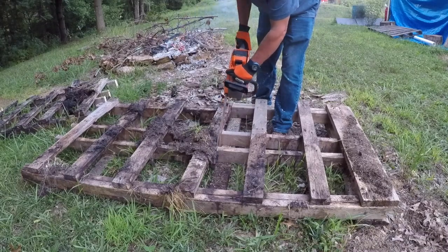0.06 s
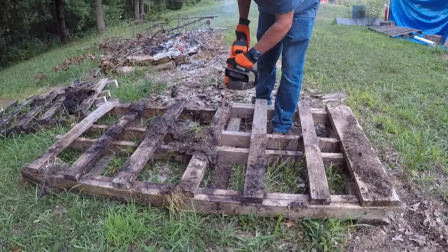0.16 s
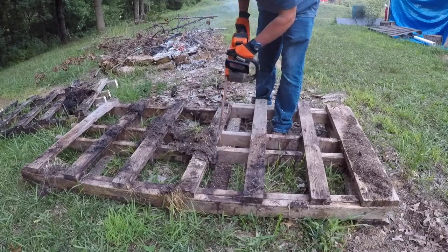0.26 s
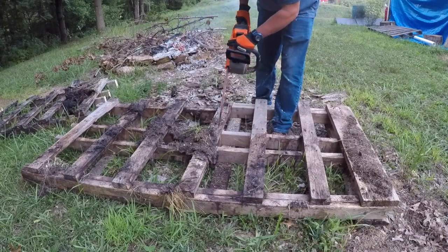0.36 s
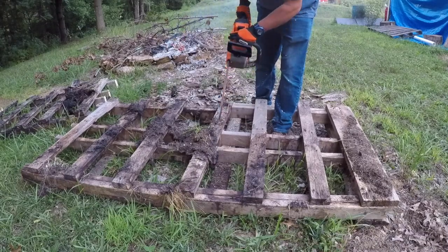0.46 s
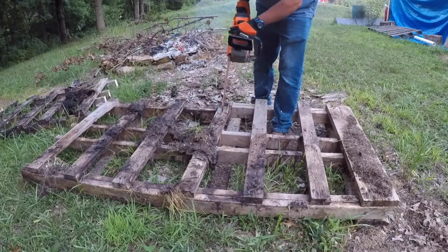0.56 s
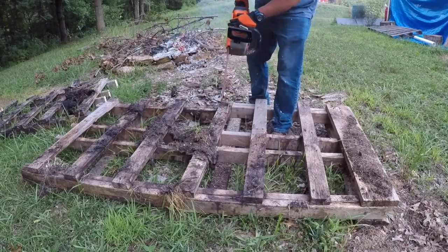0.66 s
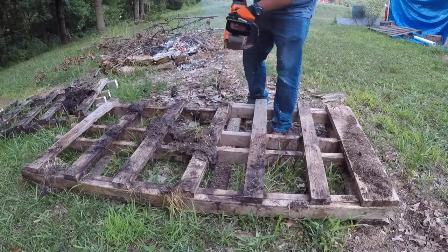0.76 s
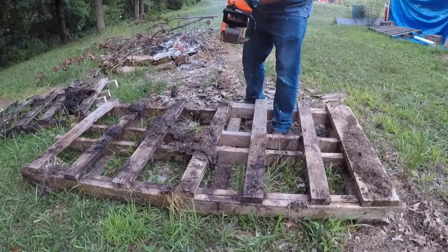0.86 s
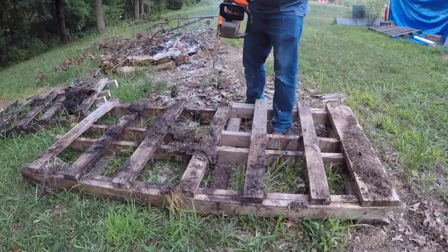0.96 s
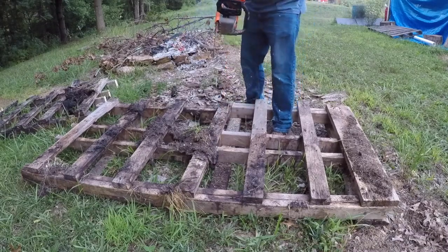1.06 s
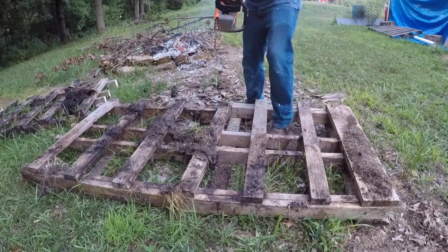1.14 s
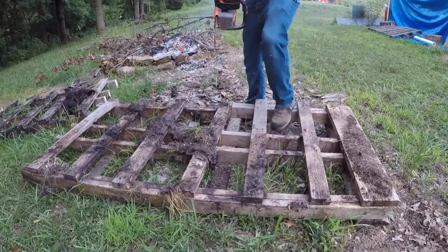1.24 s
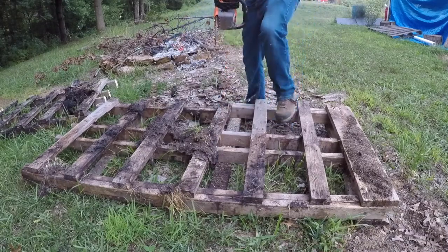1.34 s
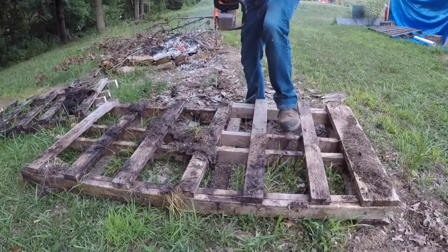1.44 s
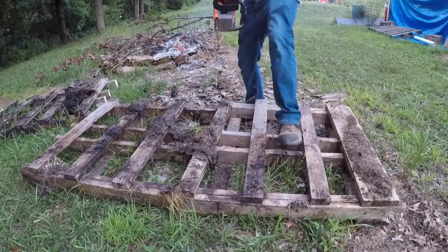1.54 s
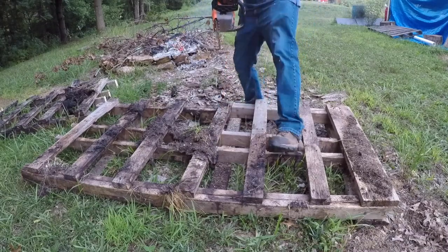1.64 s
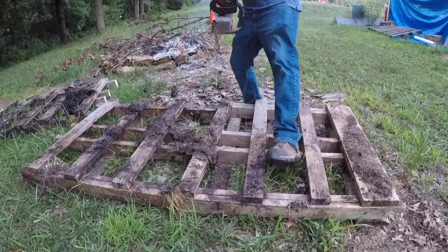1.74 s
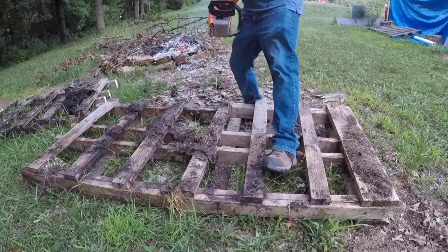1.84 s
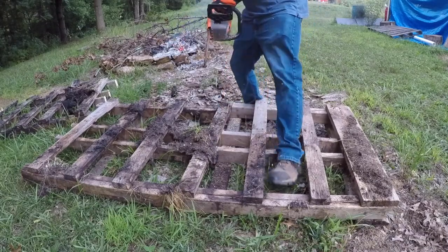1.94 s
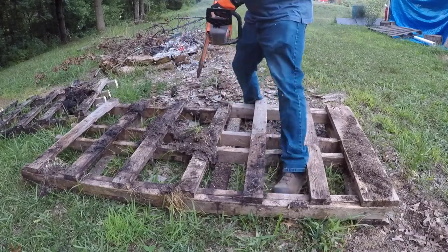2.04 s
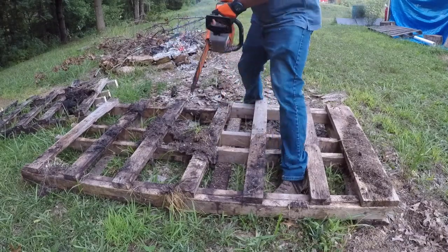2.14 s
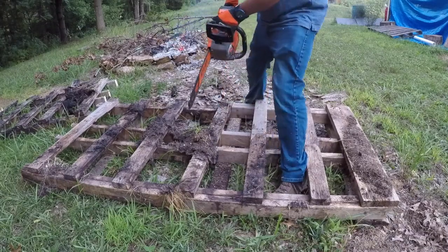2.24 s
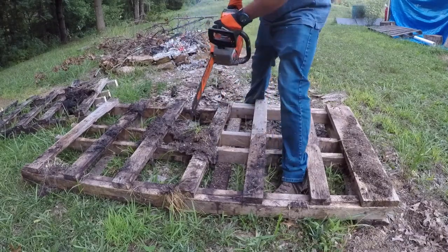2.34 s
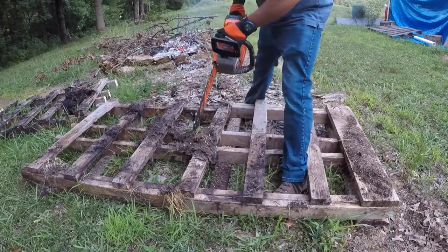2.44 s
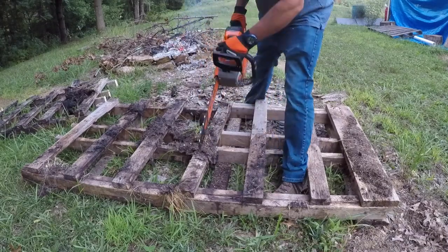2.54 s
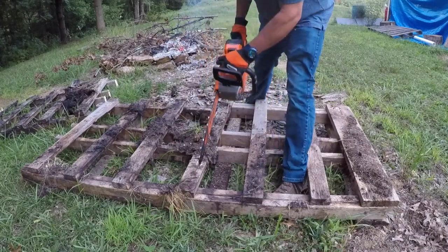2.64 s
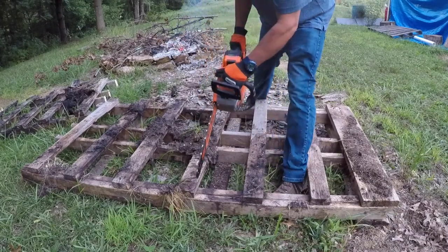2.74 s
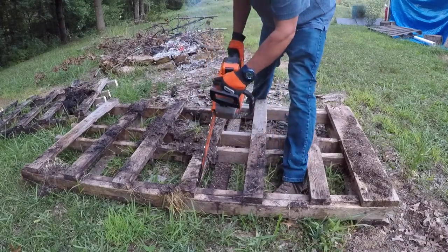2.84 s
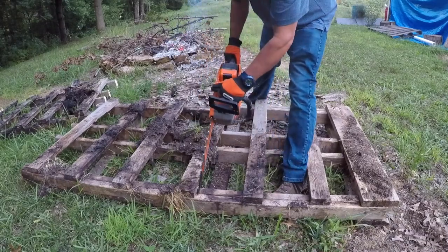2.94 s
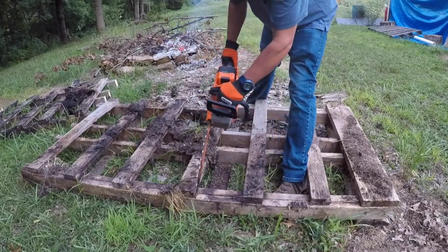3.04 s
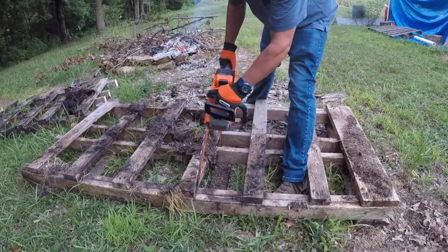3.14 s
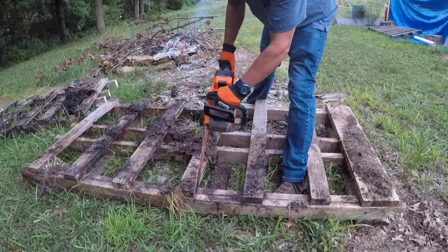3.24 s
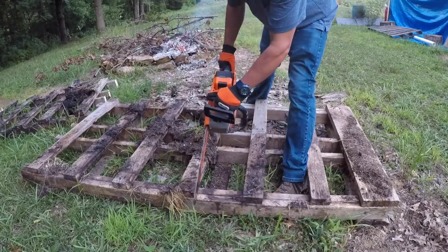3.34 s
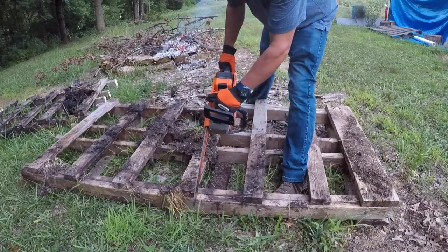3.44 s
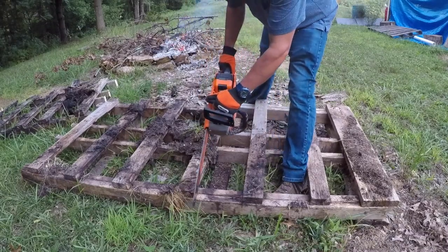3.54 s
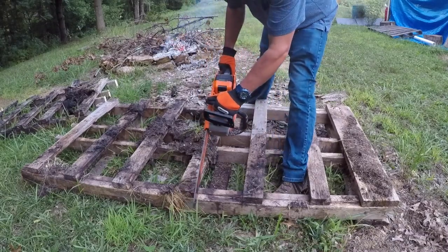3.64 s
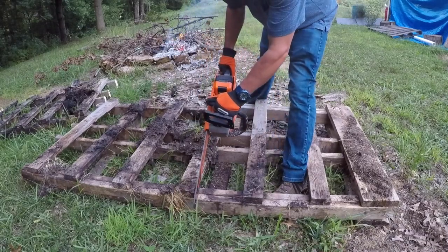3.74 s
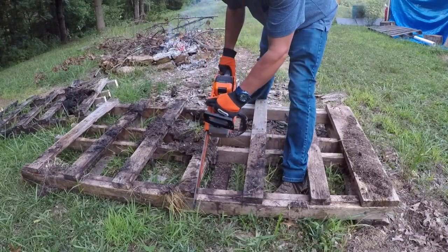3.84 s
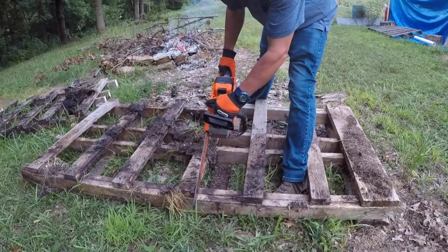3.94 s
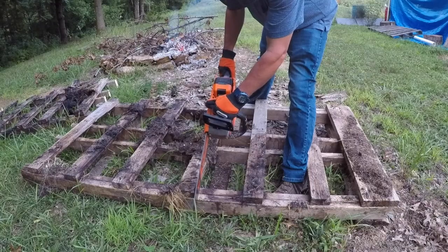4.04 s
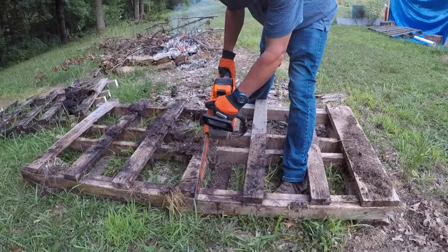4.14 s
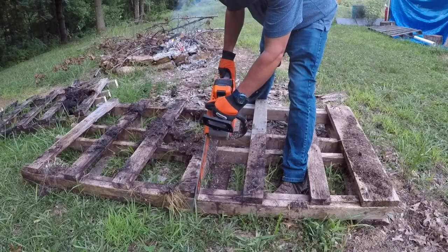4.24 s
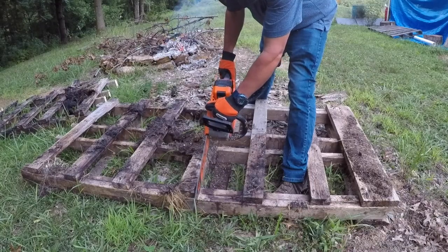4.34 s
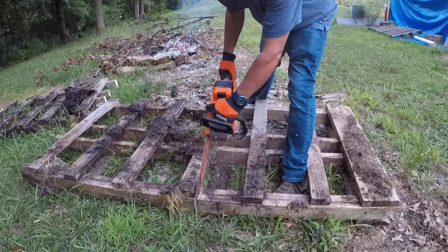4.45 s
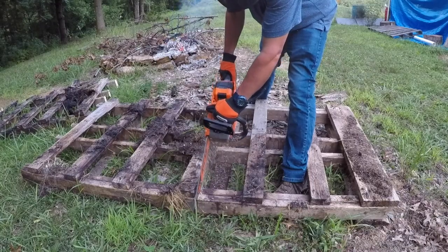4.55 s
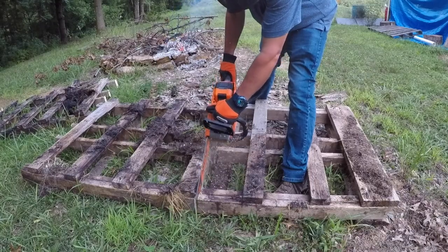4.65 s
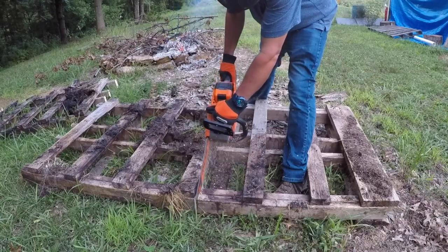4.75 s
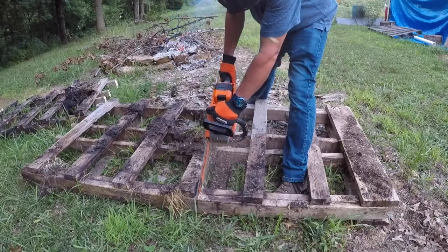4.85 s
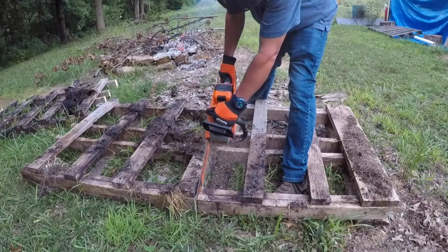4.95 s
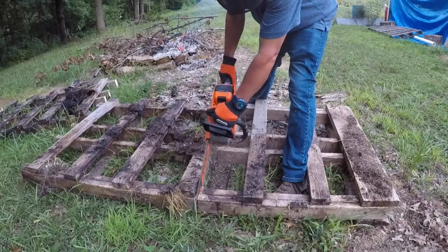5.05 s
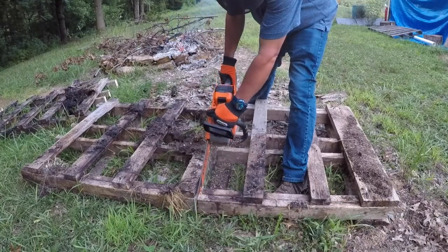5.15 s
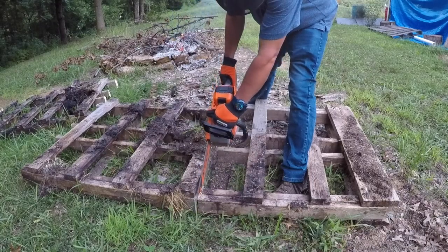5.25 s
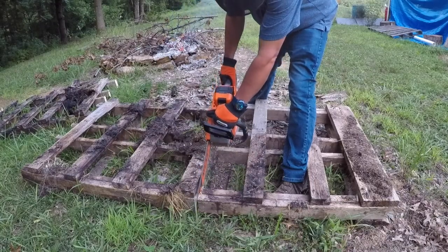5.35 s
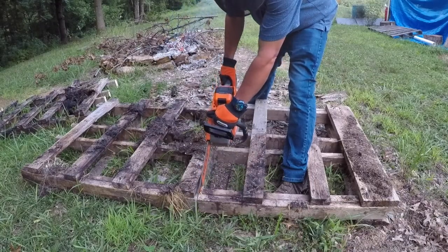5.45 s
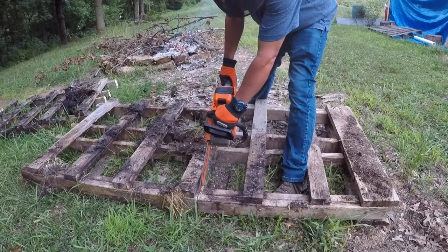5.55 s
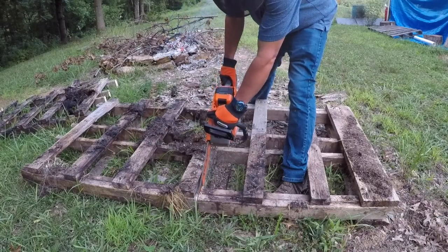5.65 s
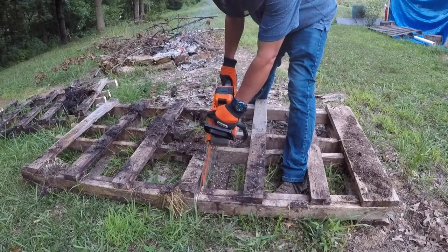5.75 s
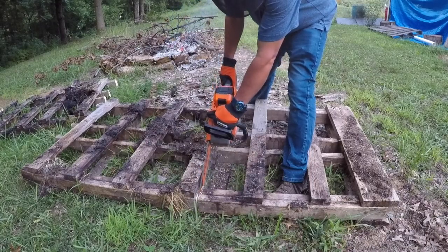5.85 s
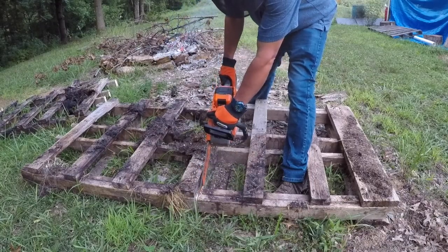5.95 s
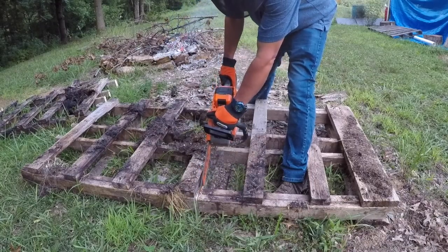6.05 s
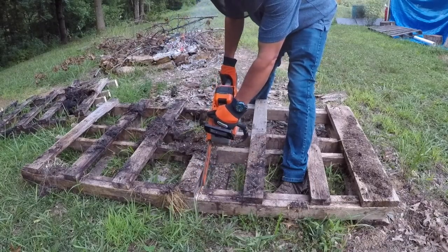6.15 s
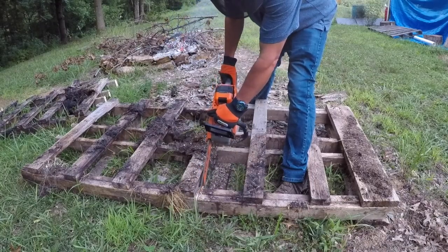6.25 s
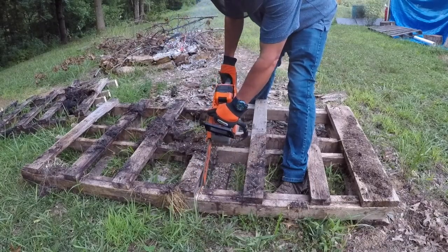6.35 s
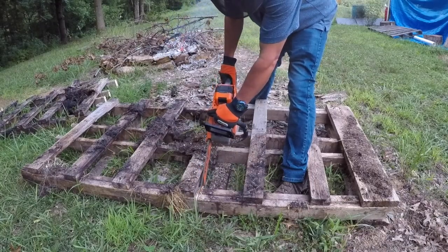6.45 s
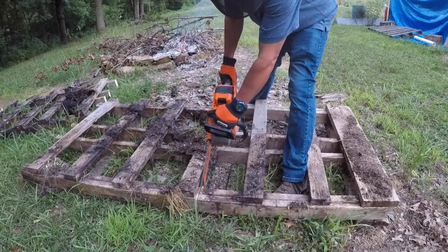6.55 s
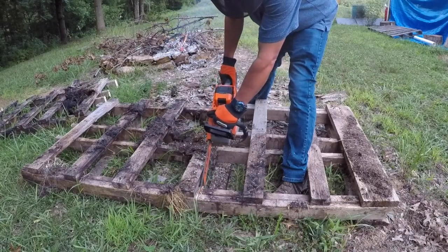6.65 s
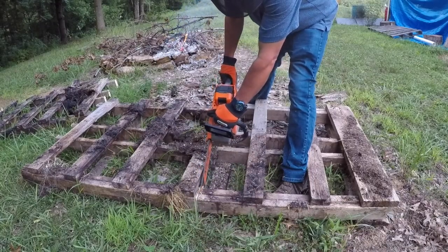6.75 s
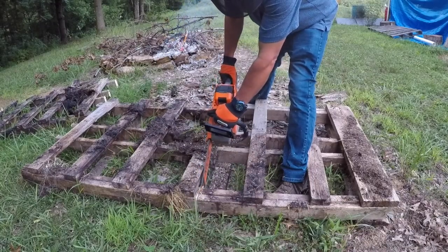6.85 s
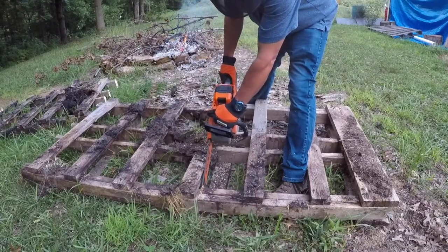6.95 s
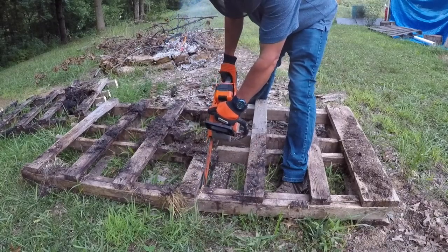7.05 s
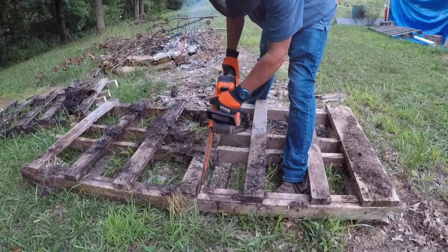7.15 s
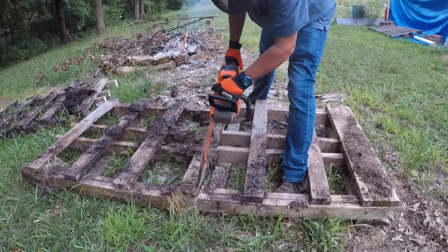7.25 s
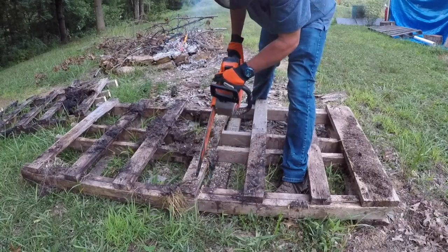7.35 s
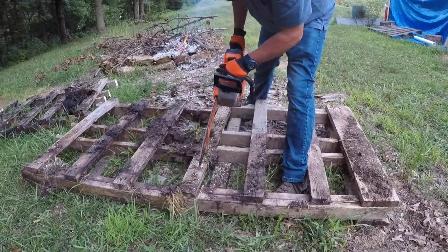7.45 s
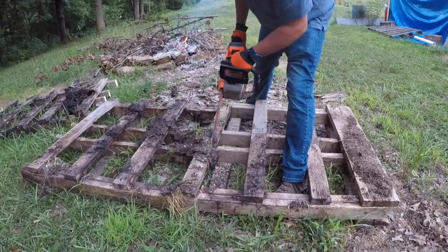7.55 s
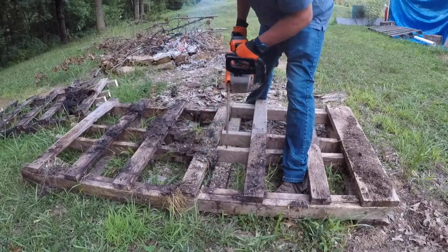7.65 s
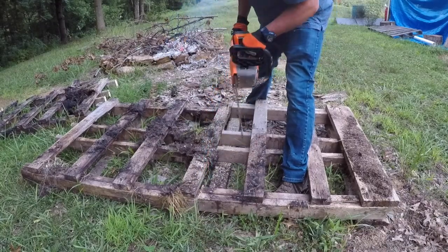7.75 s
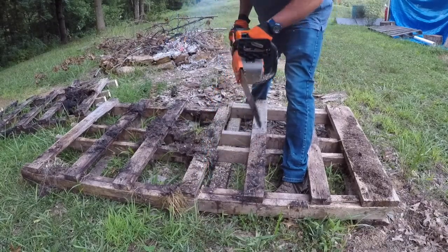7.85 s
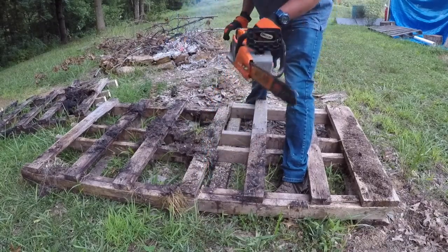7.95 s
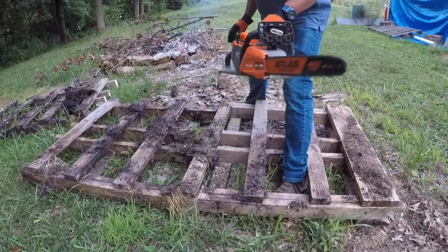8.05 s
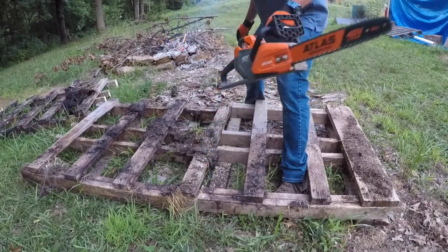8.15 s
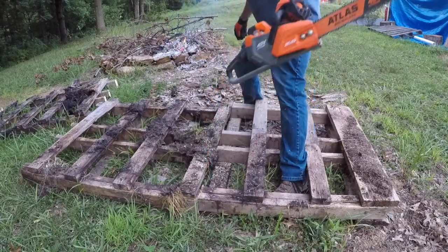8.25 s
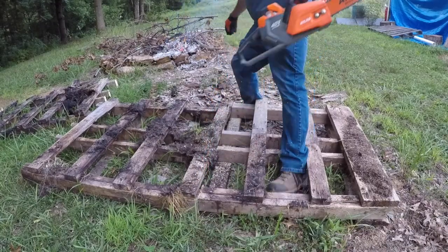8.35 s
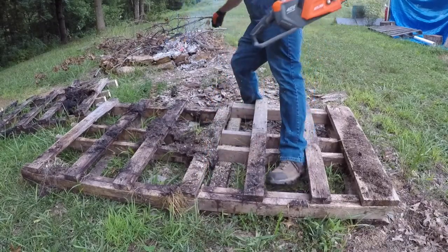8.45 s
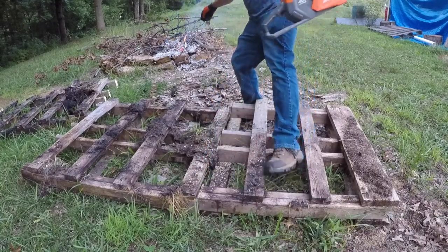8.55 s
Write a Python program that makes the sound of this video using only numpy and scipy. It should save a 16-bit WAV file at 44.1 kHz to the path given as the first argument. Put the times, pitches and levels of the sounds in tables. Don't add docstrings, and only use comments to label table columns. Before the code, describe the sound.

A cordless chainsaw coasts down and stops dead, boots shift on an old pallet, then it spins up, cuts a board and brakes.

```python
import sys
import numpy as np
from scipy import signal
from scipy.fft import rfft, irfft
from scipy.io import wavfile
from scipy.ndimage import uniform_filter1d, map_coordinates

SR = 44100
rng = np.random.default_rng(int(sys.argv[2]) if len(sys.argv) > 2 else 0)


def undo_db(level):
    steps = np.asarray(level, float) / 20
    return 10 ** steps


def transcribe(u):
    v = np.clip(np.atleast_2d(u).T, -1, 1)
    q = np.round(v * 32767).astype(np.int16)
    wavfile.write(sys.argv[1], SR, q)


N = 379260
TEETH = 6


def unit(x):
    return x / np.sqrt(np.mean(x ** 2) + 1e-20)


def noise():
    return rng.standard_normal(N)


def curves(*tables, off=None):
    t = np.arange(N) / SR
    s, *cols = np.transpose([row for table in tables for row in table])
    if off is None:
        return [np.interp(t, s, c) for c in cols]
    inside = sum((t >= table[0][0]) & (t <= table[-1][0]) for table in tables)
    return [np.where(inside, np.interp(t, s, c), off) for c in cols]


def held(rows, rise_db, fall_db):
    t = np.arange(N) / SR
    gain = 0
    for start, end, db in rows:
        before, after = np.clip(start - t, 0, None), np.clip(t - end, 0, None)
        gain = gain + undo_db(db - rise_db * before - fall_db * after)
    return gain


def wobble(rate):
    coarse = np.arange(0, N + 32, 32)
    knots = rng.standard_normal(int(N * rate / SR) + 4)
    return np.interp(np.arange(N), coarse, map_coordinates(knots, [coarse * rate / SR]))


def colour(x, points):
    f, db = np.transpose(points)
    hz = np.fft.rfftfreq(8192, 1 / SR)
    gain_db = np.interp(np.log(hz + 1), np.log(f + 1), db)
    cepstrum = irfft(np.log(undo_db(gain_db) + 1e-5))
    cepstrum[1:4096] *= 2
    cepstrum[4097:] = 0
    return unit(signal.oaconvolve(x, irfft(np.exp(rfft(cepstrum))))[:N])


def blows(turns, scatter_db, jitter):
    at = np.flatnonzero(np.diff(np.floor(turns)) > 0)
    draw = rng.standard_normal((N // 8, 3))[:len(at)]
    at = np.clip(at + jitter * SR * draw[:, 0], 0, N - 1).astype(int)
    size = undo_db(scatter_db * np.clip(draw[:, 2], -3, 1.8))
    return np.bincount(at, np.sign(draw[:, 1]) * size, N)


def flow(x, span):
    return x / np.sqrt(np.abs(uniform_filter1d(x ** 2, int(span * SR))) + 1e-6)


def near(hz, centre, width):
    return 1 / (1 + ((hz - centre) / width) ** 4)


# (time [s], wind level [dB], grass level [dB])
STIR = [(.97, -63.5, -60.5), (1.24, -63, -70), (1.512, -64, -70.5), (1.628, -59, -71), (1.95, -49, -60),
        (2.084, -44.5, -57.5), (2.194, -58, -59.5), (2.3, -53.5, -66.5), (2.45, -56, -67.5),
        (2.576, -65.5, -66.5), (2.704, -58, -73), (2.96, -63, -62), (8.14, -67.5, -58.5), (8.21, -57, -63),
        (8.266, -60, -62.5), (8.376, -61, -59.5), (8.51, -51.5, -54), (8.6, -64, -64)]
# (frequency [Hz], level [dB/Hz])
GUST = [(12, -31), (20, 0.5), (38, 5.5), (97, 6), (198, -2.5), (376, -7), (400, -22), (520, -47.5),
        (880, -120)]
# (frequency [Hz], level [dB/Hz])
GRASS = [(120, -39), (200, -23), (377, -6.5), (493, -6), (542, -4.5), (2170, -18), (5000, -23.5),
         (6500, -48), (11000, -120)]
# (frequency [Hz], level [dB/Hz])
HISS = [(1180, -26.5), (2000, -3), (4010, -5), (7470, -1), (8970, -7.5), (13100, -8.5), (14500, -9)]


def lawn():
    buffet_db, rustle_db = curves(STIR)
    hiss_db = -76 + 0.6 * (rustle_db + 70.5)
    buffet = undo_db(buffet_db - 3 + 2.8 * wobble(22)) * colour(noise(), GUST)
    blades = unit(blows(np.arange(N) * 400 / SR, 7, .002))
    rubbing = colour(noise() + 0.64 * blades, GRASS)
    rustle = undo_db(rustle_db - 1.5 + 1.4 * wobble(76) + 2.0 * wobble(15)) * rubbing
    hiss = undo_db(hiss_db + 1.1 * wobble(30)) * colour(noise(), HISS)
    note = colour(noise(), [(7500, -58.0), (7700, 6.5), (7790, -0.5), (8000, -52.0)])
    return buffet + rustle + hiss + undo_db(-85 + 2.5 * wobble(8)) * note


# (time [s], peak level [dB])
THUMPS = [(1.654, -44), (1.794, -56), (1.826, -41), (1.885, -40), (1.928, -32), (1.982, -39), (2.029, -38),
          (2.049, -40), (2.077, -44), (2.111, -43), (2.279, -42), (2.328, -48), (2.699, -49), (8.234, -48),
          (8.278, -45.5), (8.325, -51), (8.511, -52)]


def thumps():
    out, u = np.zeros(N + SR), np.arange(SR // 10) / SR / 0.0033
    for s, db in THUMPS:
        push = u * (2 - u) * np.exp(-u)
        out[round(s * SR):][:len(u)] += undo_db(db + 5) * rng.choice([-1, 1]) * push
    return out[:N]


# (time [s], peak level [dB], knock level [dB], snap level [dB], knock frequency [Hz])
TICKS = [(1.0323, -42.5, -14, -10, 1260), (1.2441, -54, -17.5, -20, 600), (1.3124, -63, -2, -4, 400),
         (1.353, -66, 2, 2, 300), (1.391, -67.5, 2, 8, 300), (1.434, -65.5, 5, 8, 685),
         (1.5885, -58, -0.5, 1, 1340), (1.6564, -57, 8, 0, 240), (1.668, -53, -9, 3, 300),
         (1.689, -62, -9, 8, 300), (1.7308, -50.5, 8, 5, 476), (1.737, -64, 17, 2, 560),
         (1.7434, -44.5, 5.5, -16, 570), (1.814, -60, 7, 7, 625), (1.879, -72, 4, 7, 1000),
         (1.898, -62, -11, 0, 900), (1.9117, -43, 3, 1, 670), (1.9217, -55, 11, 7, 312),
         (1.988, -60, 6, 8, 350), (2.0317, -53, -4, 3, 400), (2.062, -42.5, -8, -10, 450),
         (2.0774, -47, -9, -13, 500), (2.099, -58, 19.5, 11, 397), (2.113, -65, 17, 6, 480),
         (2.127, -60, 16, -3, 420), (2.139, -52, -9, -2, 400), (2.215, -66, 4, 9, 620),
         (2.2648, -55, 1, -10, 597), (2.33, -69, 8, 4, 1850), (2.464, -65, 2, 5, 302),
         (2.5062, -45, -14, -2, 597), (2.621, -63, 4, 3, 340), (2.6684, -63, 7, 13, 796),
         (2.6923, -60, 2, 16, 800), (2.728, -67, -2, 5, 300), (2.778, -69, 7, 14, 900),
         (2.929, -54, -23, -20, 900), (8.283, -50, -5, 0, 250), (8.4632, -57, -2, 2, 554),
         (8.5294, -44, -16, 0, 560), (8.5494, -51, -14, 4, 560)]


def boots():
    out, t = np.zeros(N + SR), np.arange(SR // 8) / SR
    snappy = signal.butter(2, [550, 2300], "band", fs=SR)
    crisp = signal.butter(1, [2500, 9000], "band", fs=SR)
    for s, db, knock_db, snap_db, knock_hz in TICKS:
        tick_env = (undo_db(2.5 - 60 * t / 0.0081) + undo_db(-9.5 - 60 * t / 0.062)) * (1 - np.exp(-t / 0.00055))
        tick = signal.lfilter(*crisp, rng.standard_normal(len(t)) * tick_env)
        knock = np.sin(2 * np.pi * knock_hz * t) * undo_db(knock_db + 1.5 - 60 * t / 0.04)
        snap_env = undo_db(snap_db - 6.0 - 60 * t / 0.014) + undo_db(snap_db - 0.5 - 60 * t / 0.058)
        snap = signal.lfilter(*snappy, rng.standard_normal(len(t)) * snap_env)
        out[round(s * SR):][:len(t)] += undo_db(db) * (tick + knock + undo_db(2.0) * snap)
    return out[:N]


# (frequency [Hz], level [dB], decay by 60 dB [s])
RELAY = [(844, -2.5, 0.075), (1170, 1.5, 0.042), (3250, -2.5, 0.14), (4370, -7, .025), (6700, -7, .02),
         (8400, -4, 0.024)]
# (time [s], sideband offset [Hz], level [dB])
WHISTLE = [(2.95, 30, -54), (3.05, 100, -53), (3.09, 210, -51), (3.128, 250, -46), (3.138, 263, -90)]
# (frequency [Hz], level [dB/Hz])
SIZZLE = [(2800, -38), (3600, -1), (4600, -3), (5400, -12), (7000, -40)]


def trigger():
    out, t, time = np.zeros(N), np.arange(SR // 2) / SR, np.arange(N) / SR
    ring = sum(undo_db(db - 60 * t / t60) * np.sin(2 * np.pi * hz * t) for hz, db, t60 in RELAY)
    click = signal.lfilter(*signal.butter(2, 8500, fs=SR), rng.standard_normal(len(t)))
    out[round(2.9455 * SR):][:len(t)] = undo_db(-40.0) * ring + undo_db(-45 - 60 * t / 0.011) * click
    hum = undo_db(2.5 * wobble(70)) * np.sin(2 * np.pi * 3255 * time + 1.0 * wobble(90))
    hum_gain = held([(2.96, 3.14, -55.5)], rise_db=3000, fall_db=900)
    out += hum_gain * (hum + undo_db(-8) * colour(noise(), SIZZLE))
    side_hz, db = curves(WHISTLE, off=-120)
    carrier = 2 * np.pi * 7830 * time
    swing = 2 * np.pi * np.cumsum(side_hz * (db > -100)) / SR
    whistle = 0
    for k, side_db in [(-1, -4.5), (1.3, -0.5), (0.33, -11.5)]:  # (multiple, dB)
        whistle += undo_db(side_db + 2.5 * wobble(40)) * np.sin(carrier + k * swing + .7 * wobble(200))
    return out + undo_db(db) * whistle


# (time [s], peak level [dB])
RATTLES = [(3.005, -44), (3.017, -40), (3.052, -38), (3.063, -36), (3.091, -28), (3.117, -21), (3.143, -28),
           (3.175, -23), (3.213, -24), (3.229, -23), (3.249, -26), (3.262, -21), (3.277, -23), (3.3, -27),
           (3.318, -20), (3.364, -12)]
# (frequency [Hz], level [dB/Hz])
HOUSING_FREE = [(120, -42.5), (200, -31.5), (285, -22.5), (371, -4), (584, -5), (689, -15.5), (878, -11),
                (981, -15), (1200, 0), (1370, -10), (1670, -11.5), (2030, -12.5), (2800, -13),
                (3640, -58.5), (6160, -120)]
# (frequency [Hz], level [dB/Hz])
COVER_FREE = [(1000, -31.5), (1700, 1.5), (1880, -6), (2090, -0.5), (2650, -3.5), (3000, -6.5),
              (3930, -7.5), (4770, -13), (7000, -22), (7500, -12), (9750, -35.5), (16500, -120)]


def rattles():
    t, hits = np.arange(SR // 20) / SR, np.zeros(N + SR)
    for s, db in RATTLES:
        hits[round(s * SR):][:len(t)] += undo_db(db - 60 * t / 0.031) * rng.standard_normal(len(t))
    hits = hits[:N]
    ring = colour(hits, HOUSING_FREE) + undo_db(-12) * colour(hits, COVER_FREE)
    return undo_db(-13) * ring * np.sqrt(np.mean(hits ** 2))


# (time [s], peak level [dB])
PINGS = [(3.3497, -30), (3.3951, -29), (3.4071, -26), (3.4285, -25), (3.4704, -27), (3.4879, -23),
         (3.5278, -23), (3.653, -25), (3.7897, -14), (3.8356, -22), (3.8561, -22), (3.876, -21),
         (3.9284, -21), (4.2631, -32)]
# (time [s], peak level [dB])
FIRST_BITE = [
    (3.7897, -14),
    (3.8015, -16.5),
    (3.8047, -22),
]


def pings():
    out, t = np.zeros(N + SR), np.arange(SR // 50) / SR
    for s, db in PINGS:
        tone = np.sin(2 * np.pi * rng.normal(12200, 350) * t) * (1 - np.exp(-t / .0003))
        out[round(s * SR):][:len(t)] += undo_db(db + 2.0 - 60 * t / .012) * tone
    high = signal.butter(2, 3800, "high", fs=SR)
    for s, db in FIRST_BITE:
        crack = undo_db(db - 60 * t / .009) * rng.standard_normal(len(t))
        out[round(s * SR):][:len(t)] += signal.lfilter(*high, crack)
    return out[:N]


# (time [s], length [s], frequency [Hz], width [Hz], level [dB])
SQUEAKS = [
    (7.075, 0.023, 6870, 1502, -25),
]


def squeaks():
    out, t = np.zeros(N), np.arange(N) / SR
    for s, length, hz, width_hz, db in SQUEAKS:
        band = colour(noise(), [(hz - 2 * width_hz, -50), (hz, 0), (hz + 2 * width_hz, -50)])
        window = np.exp(-((t - s - length / 2) / (length / 2)) ** 4)
        out += undo_db(db + 3.5 * wobble(240)) * band * window
    return out


# (trigger pulled [s], brake closed [s])
RUNS = [
    (-1, .938),
    (2.95, 8.088),
]
# (frequency [Hz], level [dB/Hz])
AFTER_RING = [(300, -22), (520, 3), (800, -16), (1150, 0), (1700, -40), (3000, -60)]


def brake():
    gain = held([(b - .01, b + 0.022, -38) for a, b in RUNS], rise_db=600, fall_db=1500)
    return gain * colour(noise(), AFTER_RING)


def brake_gate():
    fall = 900
    moving = held([(a, b, 0) for a, b in RUNS], rise_db=9000, fall_db=fall)
    grab = held([(b - 0.005, b, -10) for a, b in RUNS], rise_db=400, fall_db=fall)
    return moving + grab


# (time [s], ground delay [ms], echo share [1], bar facing level [dB], motor facing level [dB])
POSE = [(0, 0.47, .13, 1.5, -9.5), (.3, .36, 0.15, 2, 3.5), (.7, 0.33, 0.19, 3.5, 1),
        (.95, .27, 0.23, 0.5, -17), (2.9, 0.5, 0.05, 0.5, 6), (3.45, 0.48, 0.033, -0.5, -4),
        (3.8, 0.46, 0.031, 0.5, 2.5), (4.25, 0.37, 0.12, 0, 0), (4.75, 0.405, .2, -1.5, 10.5),
        (5.5, 0.399, 0.19, -0.5, -7), (6.05, 0.411, 0.2, -1.5, 7), (6.4, .45, 0.18, -1.5, 1.5),
        (7.1, 0.39, 0.073, 0.5, 0.5), (7.45, 0.37, 0.21, 4, 2), (7.6, 0.41, 0.31, 5, -6.5),
        (7.74, .3, 0.1, 5.5, -0.5), (7.82, .3, 0.15, 3, -5.5), (8.1, 0.26, 0.12, -2.5, -6.5)]


def ground(x):
    delay_ms, share = curves(POSE)[:2]
    at = np.clip(np.arange(N) - delay_ms * SR / 1000, 0, N - 1)
    return (x + share * map_coordinates(x, [at])) / np.sqrt(1 + share ** 2)


def patchy(x, patchy_db):
    z = signal.stft(x, nperseg=256)[2]
    field = uniform_filter1d(rng.standard_normal(z.shape), size=7, axis=0)
    field = uniform_filter1d(field, size=70, axis=1)
    return signal.istft(z * undo_db(patchy_db * unit(field)), nperseg=256)[1][:N]


# (time [s], low frequency [Hz], low level [dB], high frequency [Hz], high level [dB])
BEAM = [(0, 9700, 0.5, 12600, 0), (.12, 9700, -1, 13000, 2), (.4, 9250, 0.5, 12800, 8),
        (.5, 9050, 2.5, 12800, -2), (.7, 9200, 4, 12700, -7), (.8, 9520, -2.5, 12760, -6),
        (3.1, 9800, 5, 12350, -4), (3.4, 10100, 2.5, 12200, 5), (3.7, 9800, 2, 12000, 6.5),
        (4, 9800, 0.5, 12300, 3), (4.25, 9800, 1.5, 11900, -3), (4.6, 9700, 4.5, 12000, 3),
        (6.1, 9450, 0, 12000, -2), (7.05, 9600, -5.5, 11900, 0.5), (7.2, 9600, 8, 11800, 3),
        (7.45, 8750, -2, 11000, 2), (7.7, 9500, -11, 12300, 0), (7.9, 9500, 3, 12900, -5)]


def beamed(x):
    hz, t, z = signal.stft(x, SR, nperseg=256)
    s, *cols = np.transpose(BEAM)
    low_hz, low_db, high_hz, high_db = (np.interp(t, s, c) for c in cols)

    def lobe(centre):
        return np.exp(-((hz[:, None] - centre) / 650) ** 2)

    gain_db = low_db * lobe(low_hz) + high_db * lobe(high_hz)
    return signal.istft(z * undo_db(gain_db), nperseg=256)[1][:N]


# (time [s], tooth rate [Hz])
SPEED = [
    [(0, 800), (.09, 753), (.2, 728), (.3, 648), (.4, 559), (.5, 481.7), (.7, 351.3), (.8, 293.2),
     (.945, 206)],
    [(2.95, 12), (3.12, 80), (3.43, 434), (3.51, 490), (3.59, 535), (3.8, 592), (4.31, 603), (4.53, 852),
     (5.55, 834), (6.05, 848), (6.3, 915), (6.85, 895), (7.07, 908), (7.165, 836), (7.285, 806),
     (7.466, 618), (7.614, 487), (7.83, 338), (8.095, 176)],
]


def chain_speed():
    tooth_hz = uniform_filter1d(curves(*SPEED)[0], SR // 26, mode="nearest")
    slowing = np.gradient(tooth_hz) * SR < -610
    coasting = uniform_filter1d(1. * slowing, SR // 10)
    moving = 1. * (curves(*SPEED, off=0)[0] > 0)
    return tooth_hz, coasting, uniform_filter1d(moving, SR // 50, mode="nearest")


# (time [s], bite share [1], feed level [dB])
CUT = [(0, 0.9, 4), (.09, 0.8, 2), (.12, 0.7, -2.5), (.3, 0.6, -3), (.95, .3, -2), (3.2, 0.5, -0.5),
       (3.75, 0.9, -1), (4.05, 0.8, 1.5), (4.3, .9, 4.5), (4.42, 1, 3.5), (5.3, 1, 4), (5.8, 1, 4.5),
       (6.05, 1, 4), (6.3, 0.97, 0), (6.76, 0.99, 2.5), (7.1, 0.92, 0), (7.4, 0.61, -3.5), (8, 0.5, -1.5)]
# level at 600 teeth a second [dB],
# rise per octave [dB], shares of feed, bar facing and soft start [1]
ROAR = (-25.5, 4, 1., -0.06, 1.6)
RASPING = (-32.5, 9, 0.61, 0.32, 0.6)
CLATTER = (-33.5, 8, 0.58, 1.5, 0.8)


def drive_levels(on):
    tooth_hz, = curves(*SPEED)
    feed_db, facing_db = curves(CUT)[1], curves(POSE)[2]
    octaves = np.log2((tooth_hz + 40) / 600)
    since = np.arange(N) / SR - 2.95
    lag = -3 * (since > 0) * np.exp(-np.abs(since) / 0.07)
    on_db = 20 * np.log10(on + 1e-6)
    return [on_db + db + rise * (octaves + soft * lag) + fed * feed_db + faced * facing_db
            for db, rise, fed, faced, soft in (ROAR, RASPING, CLATTER)]


# (frequency [Hz], level [dB])
MESH = [(80, -69), (200, -54), (290, -44), (380, -27.5), (460, -28), (570, -21), (690, -29.5), (850, -37),
        (920, -37.5)]
# (frequency [Hz], driven level [dB], coasting level [dB])
OCTAVE = [(160, -70, -68), (420, -50, -40), (575, -36, -27.5), (740, -38, -41), (900, -35.5, -42.5),
          (1205, -23, -35), (1270, -35, -34), (1375, -32.5, -29.5), (1690, -33.5, -33), (1800, -33.5, -31)]


def mesh_tones(tooth_hz, coasting, turn):
    motor_db = curves(POSE)[3]

    def through(hz, points, column):
        points = np.transpose(points)
        return np.interp(np.log(hz), np.log(points[0]), points[column])

    mesh_db = through(tooth_hz, MESH, 1) + motor_db
    driven_db, coast_db = (through(2 * tooth_hz, OCTAVE, column) for column in (1, 2))
    octave_db = (1 - coasting) * driven_db + coasting * coast_db + wobble(3.2) + .4 * coasting * motor_db
    mesh_gain = undo_db(mesh_db + 1.5 * wobble(30) + 0.71 * wobble(7.5))
    mesh = mesh_gain * np.sin(TEETH * turn + 0.09 * wobble(40))
    octave = undo_db(octave_db + 1.7 * wobble(30)) * np.sin(2 * TEETH * turn + 0.42 * wobble(40))
    return mesh + octave


SHAFT = [1, 2, 3, 4, 5, 7, 8, 9, 10]
# (driven level [dB], coasting level [dB])
SHAFT_DB = [(4.5, 8), (3, 1), (-14, -9), (-9, -7.5), (-11, -7), (-8, -14.5), (-8, -14), (-12.5, -16),
            (-13.5, -18.5)]
# (multiple [1], frequency [Hz], width [Hz], level re roar [dB])
CROSSINGS = [(13, 1290, 130, -13), (13, 1900, 50, -21), (14, 1410, 110, -17), (14, 1965, 70, -21),
             (15, 1500, 110, -20), (17, 2570, 90, -17), (18, 1600, 200, -19), (24, 2150, 300, -18.5),
             (30, 4400, 260, -21)]
# (multiple [1], level re roar [dB])
SLACK = [(8, -11), (10, -10), (11, -9), (13, -10), (14, -11), (15, -11), (16, -12), (18, -16), (19, -14),
         (20, -14), (21, -12), (22, -14), (24, -16), (26, -14), (30, -14)]
# (multiple [1], frequency [Hz], width [Hz], level re roar [dB])
OVERTONES = [(3, 1320, 190, -9), (3, 2300, 200, -18), (4, 3200, 280, -11), (5, 2650, 200, -21),
             (8, 3050, 220, -24)]


def shaft_orders(tooth_hz, coasting, turn, bite, feed_db, roar_db):
    turn_hz = tooth_hz / TEETH

    def radiate(hz):
        lift = undo_db(0.88 * np.interp(hz, *np.transpose(HOUSING_FREE[1:-2])))
        small_source = 1 / (1 + (235 / hz) ** 4)
        rocking = 0.15 / (1 + ((hz - 110) / 27) ** 2)
        return lift * (small_source + rocking)

    out = np.zeros(N)
    for k, (driven, free) in zip(SHAFT, SHAFT_DB):
        db = driven + (free - driven) * coasting + 2.5 - 4.5 * bite * (1 - coasting)
        tone = np.sin(k * turn + (.12 + 0.35 * bite) * wobble(30))
        out += undo_db(roar_db + db + 2.6 * wobble(14)) * radiate(k * turn_hz) * tone
    for k, hz, width, db in CROSSINGS:
        gain = undo_db(roar_db + db - 8 * coasting + 3 * wobble(12)) * near(k * turn_hz, hz, width)
        out += gain * np.sin(k * turn + .4 * wobble(25))
    for k, db in SLACK:
        gain = undo_db(roar_db + db + 3 * wobble(14)) * (1 - bite ** 5) * radiate(k * turn_hz)
        out += gain * np.sin(k * turn + .3 * wobble(25))
    wood_db = -12 * bite ** 4 * (1 - coasting) - 2.2 * np.clip(feed_db, 0, 9)
    for k, hz, width, db in OVERTONES:
        gain = undo_db(roar_db + db + wood_db + 2 * wobble(20)) * near(k * tooth_hz, hz, width)
        out += gain * np.sin(k * TEETH * turn + .7 * wobble(40))
    return out


# (start [s], end [s], level [dB])
SHUDDERS = [
    (1, 0.054, -44),
    (4, 5.9, -43),
    (6.5, 6.64, -53),
]
# (frequency [Hz], level [dB/Hz])
BOARD = [(12, -59.5), (20, -27), (54, -35), (88, -9.5), (118, -4), (141, -17), (178, -19), (280, 1),
         (360, -30), (620, -120)]
# (start [s], end [s], level [dB])
DRUMS = [
    (-1, 0.075, -26),
    (4, 4.33, -31),
]
# (frequency [Hz], level [dB/Hz])
SLAT = [(120, -48), (195, -3), (280, -34), (390, 8.5), (480, -23), (588, 3), (680, -24.5), (785, 0),
        (900, -35.5)]
# (frequency [Hz], level [dB/Hz])
BAR = [(1030, -29.5), (1074, 10), (1120, -29.5), (1930, -45.5), (1985, -6.5), (2040, -37.5)]


def board_and_bar(knocks, chips, on, bite, roar_db):
    shake = held(SHUDDERS, rise_db=63, fall_db=58.5) * on + undo_db(roar_db - 41.0 + 2.3 * wobble(12))
    shudder = shake * undo_db(1.2 * wobble(17)) * colour(noise(), BOARD)
    drum = held(DRUMS, rise_db=72, fall_db=250.0) * colour(knocks, SLAT)
    return shudder + drum + undo_db(roar_db - 12.5) * bite * colour(chips, BAR)


# (frequency [Hz], level [dB/Hz])
HOUSING_CUT = [(120, -45), (200, -34.5), (246, -27), (285, -27.5), (323, -11), (414, -7), (459, -10.5),
               (543, 4), (741, -7.5), (822, -9.5), (894, -4), (1080, 0), (1550, -9.5), (1650, -13.5),
               (1840, -18.5), (2000, -13), (2400, -13), (3120, -42), (5280, -120)]
# (frequency [Hz], level [dB/Hz])
RASP_CUT = [(1000, -34), (1700, -21.5), (2100, -2.5), (2260, -7.5), (2710, -3), (3160, 0.5), (3500, -2.5),
            (3750, -4.5), (4100, -1), (4450, 0), (5100, 0), (6190, -6.5), (7500, -17.5), (9750, -43),
            (16500, -120)]
# (frequency [Hz], level [dB/Hz])
LINKS_FREE = [(3530, -33.5), (6000, -13.5), (7120, -9.5), (8960, 0), (11000, -1), (12000, 2.5),
              (12700, 0.5), (15200, -9)]
# (frequency [Hz], level [dB/Hz])
LINKS_CUT = [(3530, -29.5), (6000, -3.5), (6310, -5), (7700, -2), (8780, -3), (9720, -2), (11400, -5),
             (12300, -6), (15200, -8.5)]


def saw():
    tooth_hz, coasting, running = chain_speed()
    bite, feed_db = curves(CUT)
    bite = np.clip(bite, 0, 1)
    on = brake_gate()
    roar_db, rasp_db, clatter_db = drive_levels(on)
    teeth = np.cumsum(tooth_hz * (1 + .004 * bite * wobble(9))) / SR
    turn = 2 * np.pi * teeth / TEETH
    tones = mesh_tones(tooth_hz, coasting, turn)
    tones = tones + shaft_orders(tooth_hz, coasting, turn, bite, feed_db, roar_db)

    def blend(x, free, wood):
        return flow(np.sqrt(1 - bite) * colour(x, free) + np.sqrt(bite) * colour(x, wood), 0.1)

    throb = 1 + (.45 - 0.55 * bite) * np.cos(turn + 0.9 * wobble(8.3))
    slide = (tooth_hz / 800) ** 0.27
    knocks = unit(blows(teeth, 4.0, 0.00033)) * 0.62 + slide * noise()
    roar = undo_db(roar_db - 0.5 + 0.61 * wobble(45)) * throb * blend(knocks, HOUSING_FREE, HOUSING_CUT)
    dull = signal.lfilter(*signal.butter(2, 1500, fs=SR), roar)
    roar = dull + (roar - dull) * np.clip(tooth_hz / 263, 0, 1)
    chips = unit(blows(teeth, 3.1, .0004)) * 0.39 + slide * noise() * undo_db(0.76 * wobble(150))
    rasp = undo_db(rasp_db + 0.51 * wobble(35)) * throb * blend(chips, COVER_FREE, RASP_CUT)
    links = unit(blows(teeth, 7.5, .0002)) * (1.0 - .55 * bite)
    links = links + slide ** 2.3 * noise() * undo_db(1.3 * wobble(250))
    clatter = undo_db(clatter_db + 0.39 * wobble(35)) * blend(links, LINKS_FREE, LINKS_CUT)
    body = roar + board_and_bar(knocks, chips, on, bite, roar_db)
    low = np.sqrt(2) * running * tones + signal.lfilter(*signal.butter(2, 75, "high", fs=SR), body)
    return low, beamed(patchy(rasp + clatter, patchy_db=1.5))


def scene():
    background = lawn() + thumps() + boots()
    contacts = trigger() + rattles() + pings() + squeaks() + brake()
    low, high = saw()
    return (background + contacts + low + ground(high))[None]


def low_pass(x):
    return signal.sosfilt(signal.butter(12, 15870, fs=SR, output="sos"), x)


def record(dry):
    t = np.arange(N) / SR
    muted = dry * np.where((t > 1.303) & (t < 1.312), undo_db(-21.5), 1)
    top_hz = 15330
    gain = np.interp(np.fft.rfftfreq(N, 1 / SR), [top_hz - 150, top_hz + 40], [1, undo_db(-46.0)])
    narrow = irfft(rfft(muted) * gain, N)
    return low_pass(narrow)


dry = scene()
out = record(dry)
transcribe(out)
```